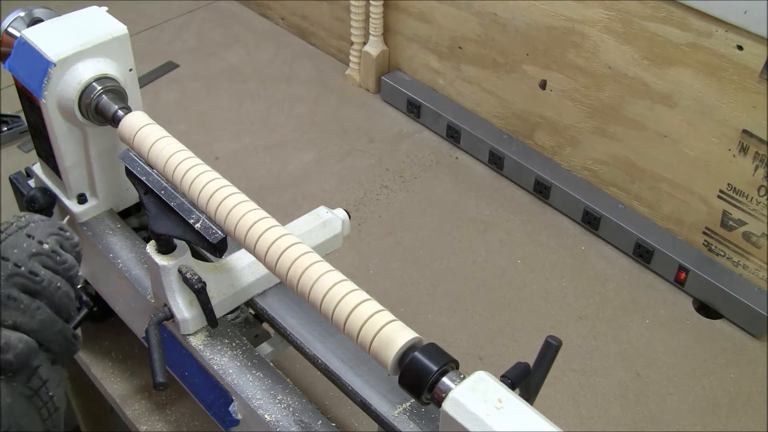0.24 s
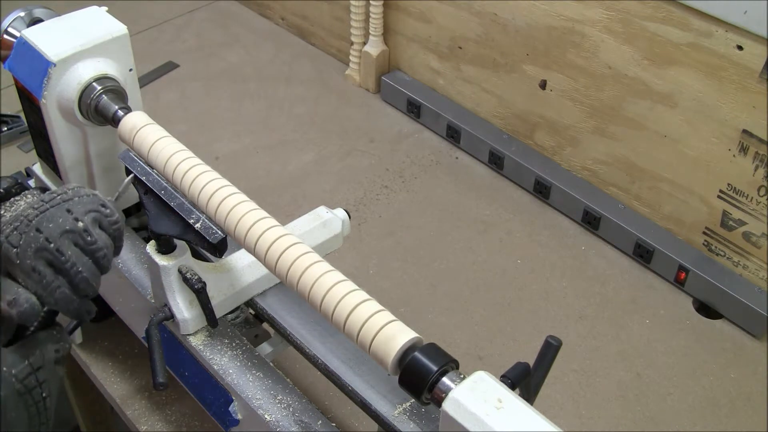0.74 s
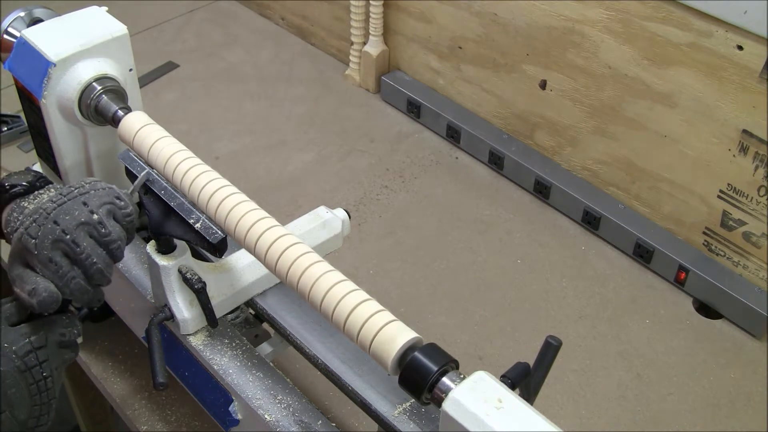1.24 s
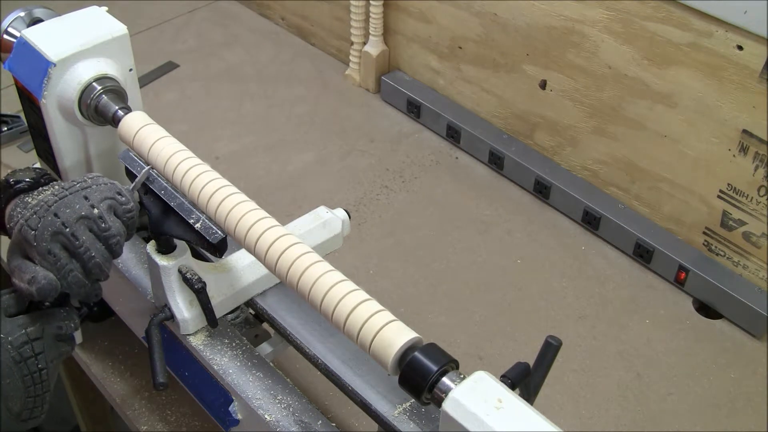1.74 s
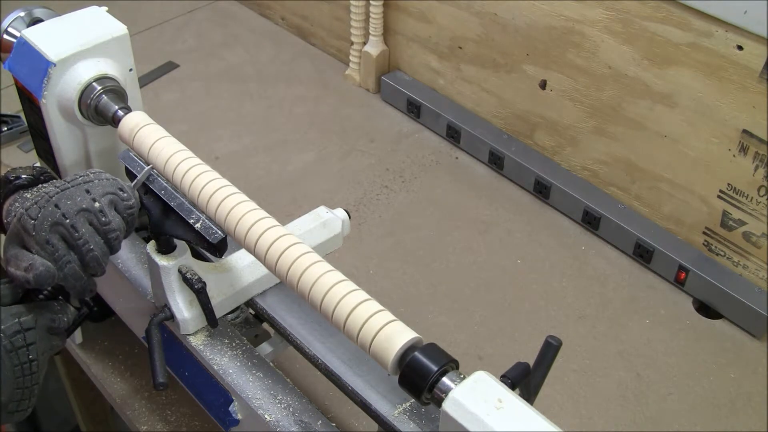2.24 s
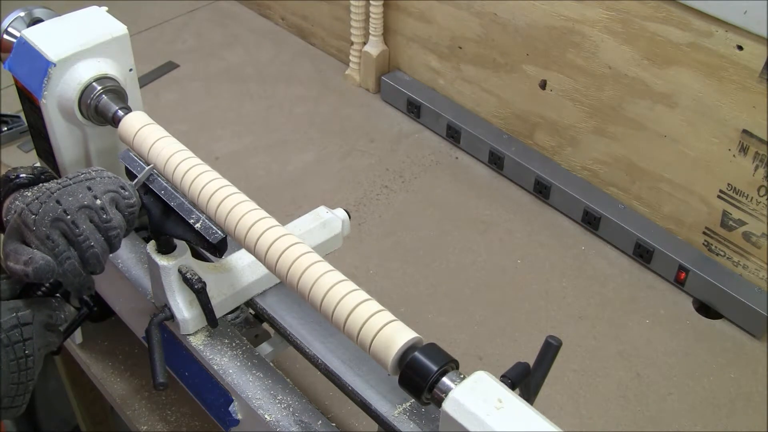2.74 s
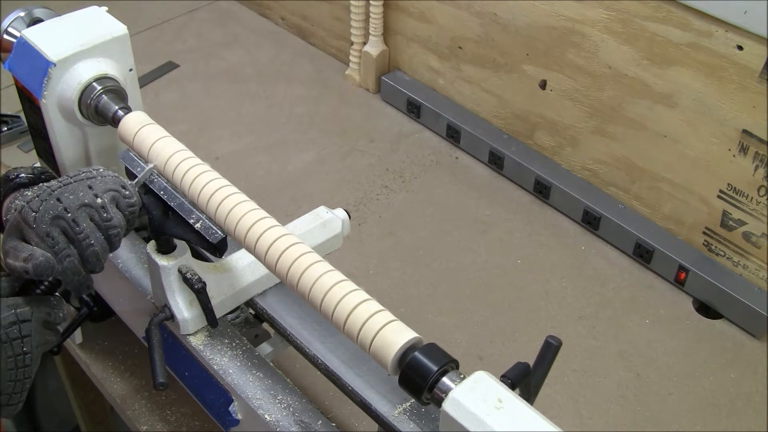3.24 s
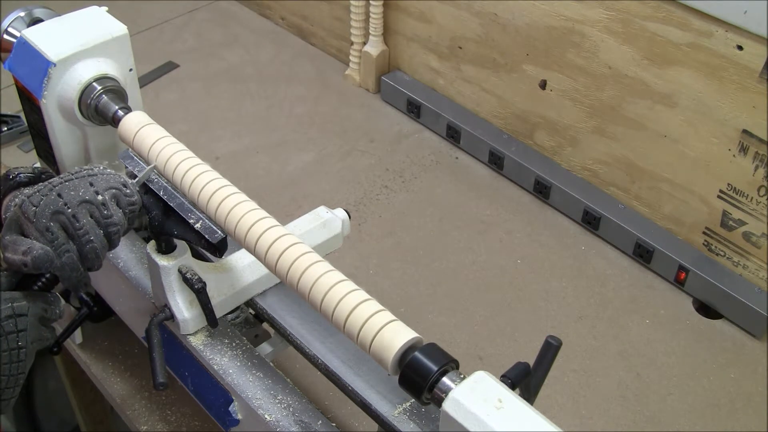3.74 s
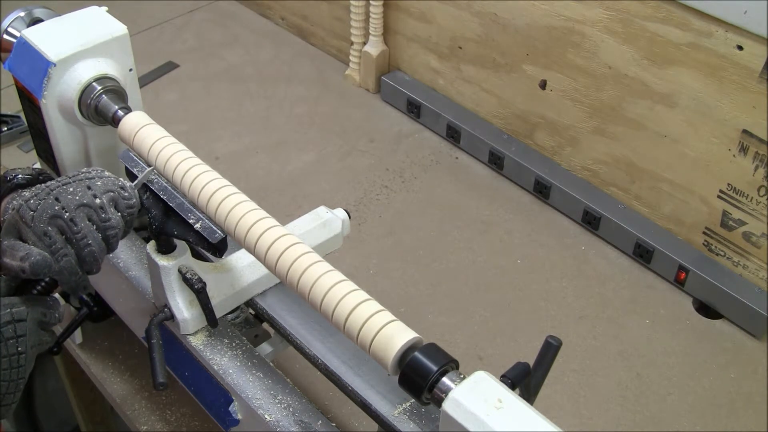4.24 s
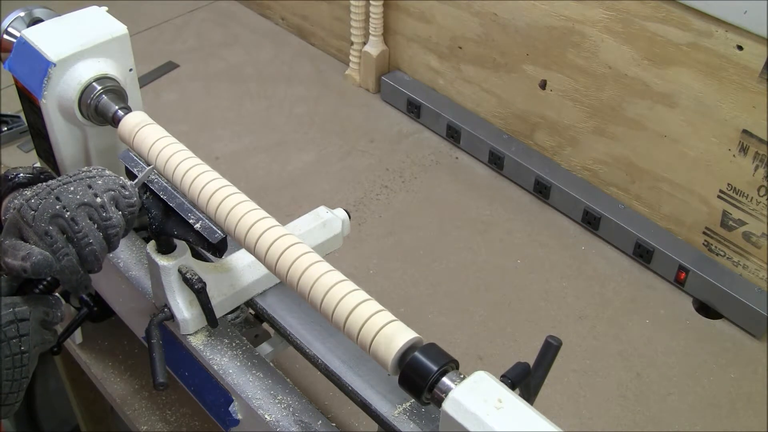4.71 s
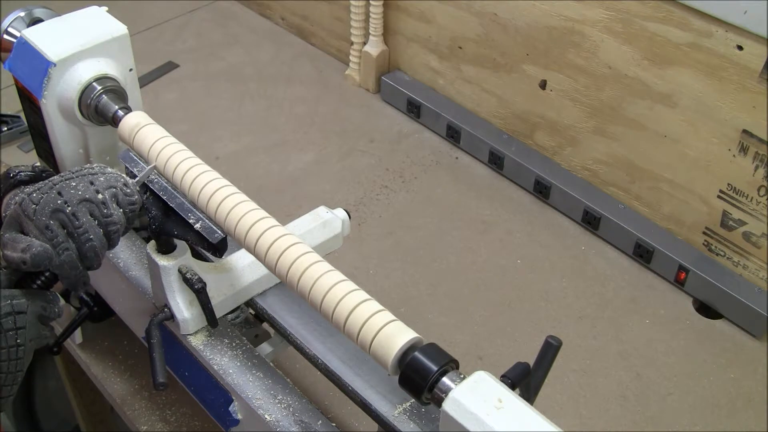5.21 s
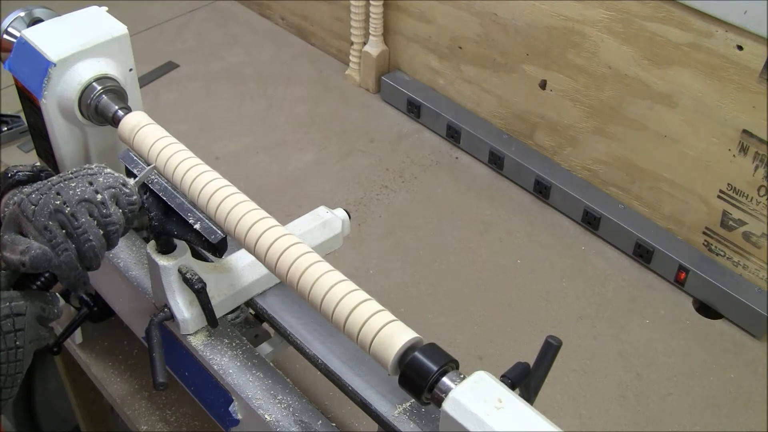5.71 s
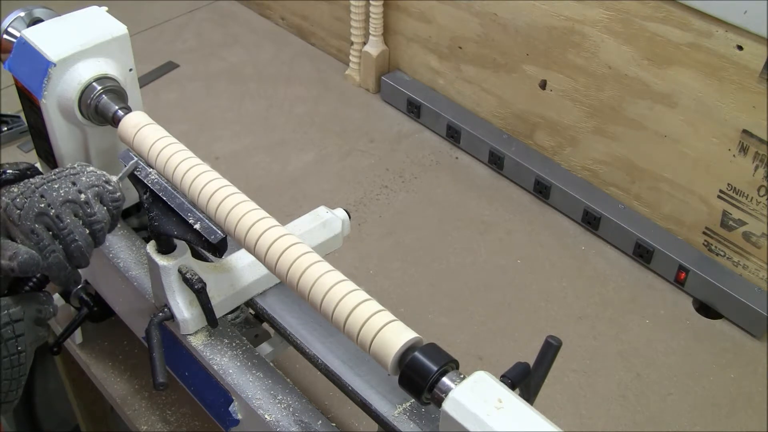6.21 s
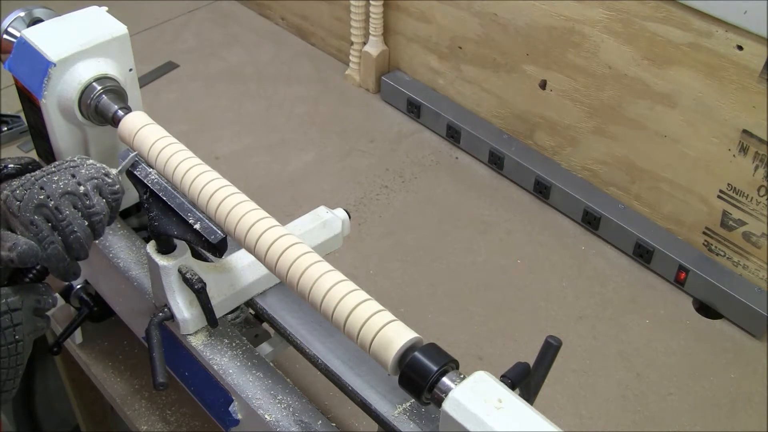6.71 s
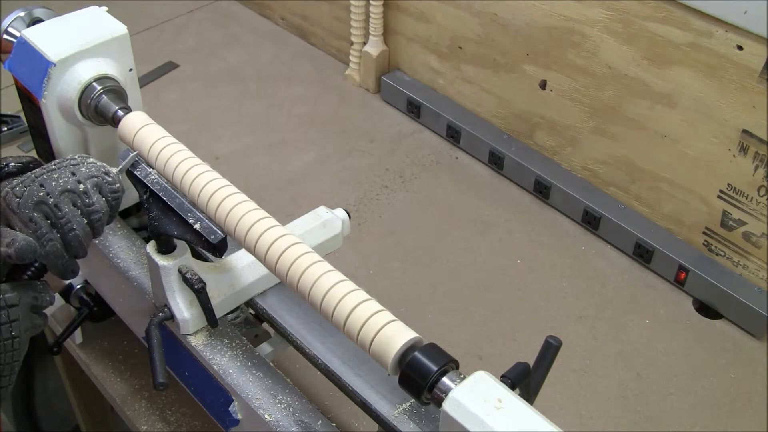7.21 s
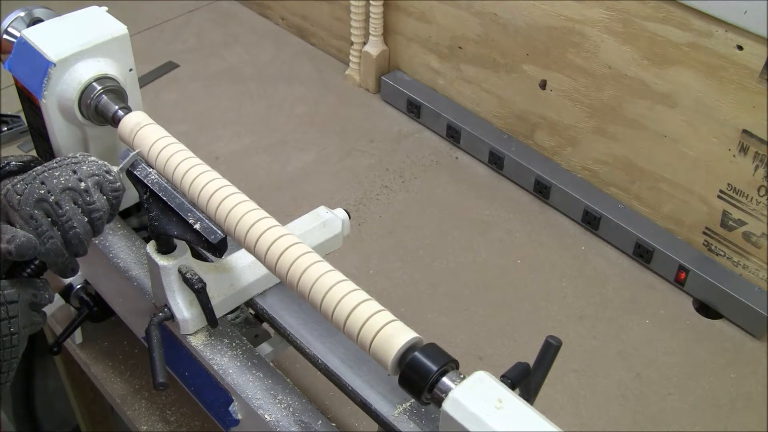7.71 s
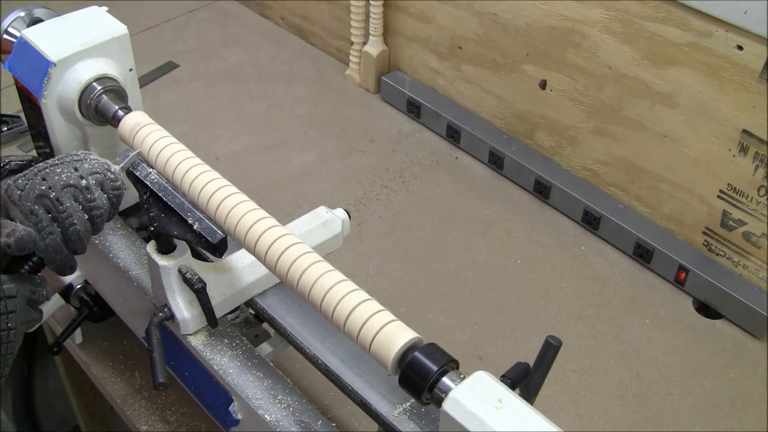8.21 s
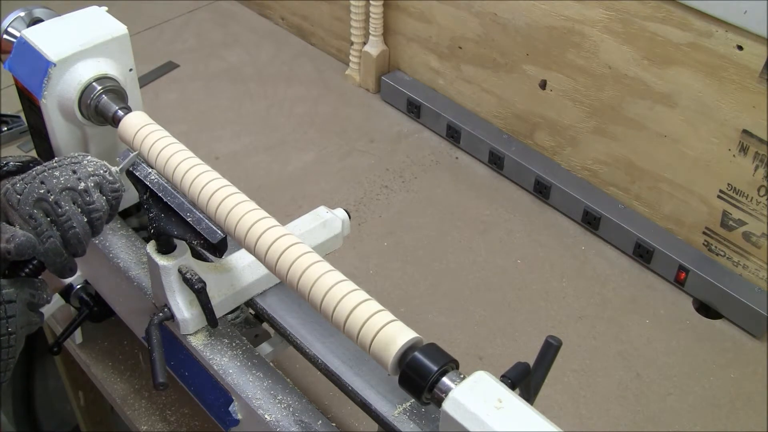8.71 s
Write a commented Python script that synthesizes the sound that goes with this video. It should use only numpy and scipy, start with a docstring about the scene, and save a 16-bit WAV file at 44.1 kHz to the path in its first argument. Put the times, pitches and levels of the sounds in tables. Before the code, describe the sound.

In a workshop with little echo, a nearby lathe hums, whines and rattles as it settles at speed. After almost three seconds a steel tool ticks against the spinning wood and bites in with a loud, rasping growl. Two more cuts follow, a couple of seconds apart, with light scrapes where the edge only skims the wood. The machine's pitch sags a little with each cut, then rises and settles.

```python
"""Turning wood on a lathe

A lathe comes up to speed in a workshop: its unbalanced drive hums, its bearings whine and rattle.
Three times a narrow steel tool is pushed into the spinning blank, ticking on the high side before it
bites fully; snapping fibres ring the wood and the steel. The spindle slows under load, overshoots and
settles after each cut, and an automatic gain control holds the cuts down."""
import sys
import numpy as np
from scipy import signal
from scipy.fft import rfft, irfft, next_fast_len
from scipy.io import wavfile
from scipy.ndimage import uniform_filter1d

SR = 44100
rng = np.random.default_rng(int(sys.argv[2]) if len(sys.argv) > 2 else 0)


def file_out(sig):
    """Save sig as 16-bit WAV at sys.argv[1]."""
    # one column per channel
    cols = np.atleast_2d(sig).T
    # limit, then scale
    lim = np.clip(cols, -1, 1)
    pcm = np.round(lim * 32767).astype(np.int16)
    wavfile.write(sys.argv[1], SR, pcm)


N = 394694
T = np.arange(N) / SR
HZ = np.fft.rfftfreq(next_fast_len(N), 1 / SR)
RUN_SPEED, SAG, OVERSHOOT = 22.64, 1.1, 1.0  # turns per second

# Plunges of the tool. Each row: in seconds, the start, the lengths of entry, feed, hold and easing off,
# and the delays to lowest speed and keenest bite; in dB, force, boom, rasp and off-round swing.
PLUNGES = [(2.802, 0.014, .78, .335, .18, 0.75, 0.21, 0.5, -0.5, -0.55, 8.5),
           (4.85, .04, .225, .575, 0.1545, .5, 0.45, -1, 3, -1.5, -4),
           (7.529, 0.012, .62, .25, .24, .66, 0.32, 1.5, -1, -0.5, 6.5)]
# Stereo balance of the machine. Each row: frequency in Hz, left over right in dB.
MACHINE_BALANCE = [(60, 22), (150, -0.5), (380, -2), (950, -3.5), (2380, -1.5), (5980, -0.5), (15000, 0)]


def cut(row, groove, scrape, turns, rounding_s=0.15, flare_s=0.15, leave_s=0.044):
    """Amplitude modulation: the high side strikes the edge once a turn, less as the groove gets round."""
    start, entry_s, feed_s, hold_s, ease_s, _, keen_s, force_db, boom_db, rasp_db, off_round_db = row
    since = np.maximum(T - start, 0)
    fresh = np.clip(1 - since / feed_s, 0, 1)
    depth = np.minimum(since / (feed_s + hold_s), 1)
    easing = np.clip((since - feed_s - hold_s) / ease_s, 0, 1)
    slack = easing ** 1.8
    lump_db = max(off_round_db, 0) * np.exp(-since / rounding_s)
    keen_db = 8 * np.exp(-((since - keen_s) / flare_s) ** 2) + lump_db - 19 * slack
    # A fresh cut is thin and raspy; as the tool eases off, the blank booms and the bevel rubs.
    boom_db = boom_db - 1.5 * fresh + 10.5 * easing
    rasp_db = rasp_db + 5 * fresh + 8 * easing
    # The lowest bending mode grows as the groove deepens and swings out when the tool lets go.
    bend_db = 5 * np.sin(np.pi * easing) - 6 * fresh - 3 * (1 - depth)
    sound = tool_grip(scrape, groove, (boom_db, rasp_db, keen_db, bend_db))
    swing_db = 2.5 + lump_db + 0.5 * depth ** 2  # deep in the groove the tool binds
    leaving = np.clip((feed_s + hold_s + ease_s - since) / leave_s + 1, 0, 1)
    touching = np.clip(since / entry_s, 0, 1) * leaving
    push_db = force_db - 26 * fresh - 32 * slack
    return sound * touching * amp(push_db + swing_db * contact(turns, start) + 0.89 * wander(60))


def contact(turns, start):
    """Periodic forcing: within each turn the edge bites fast and lets go slowly."""
    phase = (turns - np.interp(start, T, turns)) % 1
    return np.interp(phase, [0, .13, .32, .68, 1], [-.55, .48, .25, -.5, -.55])


def fibres(turns, snaps_per_s=7000, chips_per_s=90):
    """Impulse excitation: snapping fibres and chips, over a steady rub, ring the blank and the tool."""
    # Spectrum of tearing wood. Each row: frequency in Hz, relative density in dB.
    tearing = [(110, -36), (200, -37.5), (280, -18.5), (500, -9.5), (900, -20), (1300, 2.5), (2100, -9),
               (3000, -10), (4200, -18.5), (6300, -12), (7300, -25), (8800, -20), (12000, -22.5),
               (15600, -23.5)]
    # Resonances and notches of blank, tool and rest. Each row: centre and width in Hz, gain in dB.
    body_modes = [(296, 37, 16.5), (358, 14, -3.5), (398.5, 47, 10.5), (596.3, 18, 11), (648, 11, 4.5),
                  (709.5, 37, -8.5), (756.6, 65, 12.5), (819, 61, -12), (871, 130, 11), (1195, 14, 7.5),
                  (1234, 13, 7), (1640, 190, -6.5), (1790, 27, 8), (2090, 12, -18), (2330, 31, 2.5),
                  (2715, 77, 10), (3095, 57, 6), (3486, 200, 2), (3960, 300, 2.5), (8140, 164, 9)]
    # The blank's narrow singing modes. Each row: centre and width in Hz, gain in dB.
    singing_modes = [(393, 21.5, 7.5), (750, 65, 3.5), (2690, 64, 0)]
    snaps = (rng.random(N) < snaps_per_s / SR) * amp(3 * np.minimum(rng.exponential(1, N), 3))
    friction = evened(snaps * rng.choice([-1, 1], (2, N))) + rng.standard_normal((2, N))
    chips = (rng.random(N) < chips_per_s / SR) * rng.uniform(-4, 4, (2, N))
    force = recurring_grain(friction, turns) + brightened(chips)
    gain_db = read(tearing, HZ) + bumps(HZ, body_modes) + bumps(HZ, singing_modes)
    return evened(colour(force, gain_db + 5.5 * crowded_modes()))


def recurring_grain(friction, turns, memory=.78, coarse_hz=1600, samples_per_turn=1900):
    """Quasi-periodicity: coarse grain returns each turn, a little changed, so its growl follows speed."""
    rings = friction[:, :N - N % samples_per_turn].reshape(2, -1, samples_per_turn)
    grain = signal.lfilter([np.sqrt(1 - memory ** 2)], [1, -memory], rings, axis=1).reshape(2, -1)
    passing = np.take(grain, (turns * samples_per_turn).astype(int), axis=1, mode="wrap")
    low, high = (signal.butter(1, coarse_hz, kind, fs=SR) for kind in ("lowpass", "highpass"))
    return signal.lfilter(*low, passing) + signal.lfilter(*high, friction)


def tool_grip(scrape, groove, controls_db, boom_hz=850, rasp_hz=2200, dull_hz=7000):
    """Time-varying filtering: the tool's grip sets the boom, rasp, keenness and bending resonance."""
    # Modes of the lightly held tool. Each row: centre and width in Hz, share of the ring.
    tool_modes = [(2780, 47, 0.71), (3800, 80, 1), (6670, 97, 0.89), (7950, 1060, 1.0)]
    f, t, spectra = signal.stft(scrape, SR, nperseg=1024)
    boom_db, rasp_db, keen_db, bend_db = (np.interp(t, T, c + np.zeros(N)) for c in controls_db)
    f = f[:, None]
    gain_db = boom_db * (1 - above(f, boom_hz)) + rasp_db * above(f, rasp_hz)
    gain_db += bumps(f, groove) + bend_db * bump(f, hz=288, width=93)
    gain_db += np.maximum(keen_db, 0) * bumps(f, tool_modes)  # a keen bite rings the tool
    gain_db += np.minimum(keen_db, 0) * 0.77 * above(f, dull_hz)  # a rubbing bevel loses the top
    return signal.istft(spectra * amp(gain_db), SR, nperseg=1024)[1][:, :N]


def touches(scrape, attack_s=0.0036, release_s=0.0074, boom_db=3.5, rasp_db=8.0, bend_db=-7):
    """Light sliding friction: the edge catches or skims the wood with a thin, raspy scrape."""
    # Brief contacts. Each row: start and length in seconds, force and keenness in dB.
    grazes = [(2.847, 0.0067, -28, 13), (4.117, 0.03, -38.5, 1.5), (4.751, 0.05, -29.5, -1),
              (4.802, 0.093, -31.5, -13), (8.62, 0.11, -32.5, -12.5), (8.722, 0.036, -34, -11)]
    # Colour of the barely loaded tool. Each row: centre and width in Hz, gain in dB.
    light_load = [(2780, 170, -3), (3200, 390, 5)]
    force, keen_db = np.zeros((2, N))
    for start, length, db, keenness_db in grazes:
        corners_s = np.cumsum([0, attack_s, length, release_s])
        force += amp(db) * np.interp(T - start, corners_s, [0, 1, 1, 0])
        keen_db[T >= start - attack_s] = keenness_db
    return force * tool_grip(scrape, light_load, (boom_db, rasp_db, keen_db, bend_db))


def woodcutting(turns):
    """Superposition: cuts and touches sound in the room, with rumble below 120 Hz filtered out."""
    # Each groove's load on the tool, one list a cut. Each row: centre and width in Hz, gain in dB.
    grooves = [
        [(474, 76, 4), (4820, 3200, -1.5), (6300, 700, 1.5), (8500, 420, 2)],
        [(612.8, 68, 1), (3120, 450, 1), (4900, 610, 0), (6160, 870, 2), (12500, 4700, -0.5)],
        [(450.7, 57.8, 9), (3270, 634, 2), (5137, 2200, 4), (6220, 620, -5.5), (9900, 310, 6.5)],
    ]
    # Likeness of the two channels. Each row: frequency in Hz, coherence from 0 to 1.
    coherence = [(60, 1.0), (130, 0.99), (290, 0.99), (640, 1), (1410, 1), (3100, 1), (6820, 0.61),
                 (15000, 0.71)]
    # Stereo balance. Each row: frequency in Hz, left over right in dB.
    balance = [(60, -44), (130, 4), (290, -2.0), (640, -3), (1410, -1), (3100, -0.5), (6820, -0.5),
               (15000, 0)]
    # Phase between the channels. Each row: frequency in Hz, lead of the left in radians.
    phase_lead = [(60, 0), (3000, 0.56), (6500, 0), (8400, 0.83), (12000, 1.5), (15500, 2)]
    scrape = fibres(turns)
    cuts = sum(cut(row, groove, scrape, turns) for row, groove in zip(PLUNGES, grooves))
    highpass = signal.butter(2, 120, "highpass", fs=SR, output="sos")
    filtered = signal.sosfilt(highpass, cuts + touches(scrape))
    return stereo(workshop(filtered), coherence, balance, read(phase_lead, HZ))


def spindle(start_lag=4.55, spin_up_s=.35, settle_s=.29):
    """Transient response in turns per second: the drive spins up, sags in each cut and overshoots."""
    speed = RUN_SPEED - start_lag * np.exp(-T / spin_up_s)
    for start, _, feed_s, hold_s, ease_s, slowest_s, *_ in PLUNGES:
        slowest, end = start + slowest_s, start + feed_s + hold_s + ease_s
        dragged = np.sin(np.interp(T, [start, slowest], [0, np.pi / 2])) ** 2
        regained = np.interp(T, [slowest, end], [0, 1]) ** 2
        settling = np.exp(-np.maximum(T - end, 0) / settle_s)
        speed += ((SAG + OVERSHOOT) * regained - SAG * dragged) * settling
    return speed


def whine(speed, turns, flutter=0.34, slip_rad=0.48):
    """Random modulation: bearing tones flutter as the balls slip, and swell in the housing's band."""
    # Bearing and motor tones. Each row: multiple of the spindle speed, level in dB.
    orders = [(16.28, -66.5), (18.07, -58.5), (25.58, -55.5), (26.19, -66.5), (27.12, -53.5),
              (33.35, -55.5), (35.13, -66.5), (39.88, -59.5), (42.86, -57), (45.85, -59), (47.63, -45.5),
              (48.81, -47.5), (49.93, -51), (52.84, -54), (54.23, -46), (54.78, -51), (58.66, -53.5),
              (59.67, -41), (60.67, -44), (61.93, -50), (65.08, -46.5), (70.5, -49), (80.42, -54)]
    out, usual = np.zeros((2, N)), np.median(speed)
    for order, db in orders:
        housing_db = 15 * (housing(order * speed) - housing(order * usual))
        angle = 2 * np.pi * (order * turns + rng.random()) + slip_rad * wander(9)
        tone = np.sin(angle) * (1 + flutter * wander(45)) + flutter * wander(45) * np.cos(angle)
        pan = amp(read(MACHINE_BALANCE, order * usual) * np.array([[.5], [-.5]]))
        out += pan * amp(db + housing_db + strain(order, speed)) * tone
    return np.sqrt(2) * out


def housing(f):
    """Radiation efficiency: the bearing housing favours a broad band with a steep lower edge."""
    return bump(f, hz=1300, width=600) / (1 + np.exp((1045 - f) / 22))


def rattle(speed, turns, level_db=-39, balls_per_turn=5.43):
    """Rolling noise rings the frame, pulsing as each ball passes, with a thin swish once a turn."""
    # Spectrum of the rattle and hiss. Each row: frequency in Hz, relative density in dB.
    spectrum = [(25, -21), (55, -25), (75, -31), (110, -2.5), (200, -8.5), (280, -4.5), (600, -0.5),
                (1000, -7), (1330, 1), (1750, 0.5), (2200, -7.5), (3100, -9), (6500, -20.5), (15500, -24)]
    # Resonances of headstock and bed. Each row: centre and width in Hz, gain in dB.
    frame_modes = [(271, 10, 9.5), (585, 18, 5), (790, 34, 7), (1120, 86, 13), (2820, 1000, 5.5),
                   (3700, 270, 3), (5270, 44, 8.5)]
    # Likeness of the two channels. Each row: frequency in Hz, coherence from 0 to 1.
    coherence = [(60, 1.0), (150, 0.53), (380, 0.22), (950, 0.82), (2380, 0.84), (5980, 0.64),
                 (15000, 0.03)]
    angle = 2 * np.pi * turns
    pulse_db = 0.74 * np.cos(angle) + 2 * np.cos(balls_per_turn * angle) + 0.5 * wander(500)
    rolling = rng.standard_normal((2, N)) * amp(pulse_db)
    swish = 0.44 * np.sin(angle / 2) ** 16 * brightened(rng.standard_normal((2, N)))
    noise = stereo(rolling + swish, coherence, MACHINE_BALANCE)
    sound = colour(noise, read(spectrum, HZ) + bumps(HZ, frame_modes) + 3.5 * crowded_modes())
    return amp(level_db) * sound / np.std(sound.mean(0)) * speed / RUN_SPEED


def hum(speed, turns, gain_db=-1.5):
    """Forced vibration: unbalanced pulleys and belt shake the bench, more with speed and at resonance."""
    # Drive and belt tones. Each row: multiple of the spindle speed, relative level in dB.
    orders = [(2.832, -64), (3.064, -52.5), (3.296, -65), (3.529, -53), (3.76, -64), (4, -68), (4.944, -62),
              (5.427, -68), (7.539, -67), (10.85, -69), (11.31, -61), (11.9, -69), (14.28, -66)]
    # Low resonances of the bench. Each row: centre and width in Hz, gain in dB.
    bench_modes = [(74.3, 7, 13), (226, 32, 12)]
    out = np.zeros(N)
    for order, db in orders:
        gain = amp(db + bumps(order * speed, bench_modes) + strain(order, speed))
        out += gain * np.sin(2 * np.pi * (order * turns + rng.random()))
    shake = (speed / np.median(speed)) ** 4
    return np.sqrt(2) * amp(gain_db) * shake * out


def strain(order, speed):
    """Saturating gain in dB: a motor tone swells while the drive pushes past its set speed."""
    # Bands that swell. Each row: centre and width in Hz, greatest gain in dB.
    bands = [(265, 21, 11), (410, 40, 6), (770, 48, 5.5)]
    excess = np.maximum(speed - RUN_SPEED, 0)
    return np.tanh(excess / 0.3) * bumps(order * (RUN_SPEED + OVERSHOOT / 2), bands)


def glove(at_s=.26, half_width_s=0.032, level_db=-53):
    """Friction noise: a glove brushes faintly as the hand comes up to the rest."""
    band = signal.butter(2, [3000, 9000], "bandpass", fs=SR, output="sos")
    brush = evened(signal.sosfilt(band, rng.standard_normal((2, N))))
    return amp(level_db + 3 * wander(200)) * brush * np.exp(-((T - at_s) / half_width_s) ** 2)


def workshop(x, t60_s=0.27, wet_db=-13):
    """Reverberation: reflections from walls and bench add a short exponential tail."""
    t = np.arange(SR // 2) / SR
    tail = rng.standard_normal((2, len(t))) * amp(-60 * t / t60_s) * (t > .004)
    return x + amp(wet_db) * signal.fftconvolve(x, tail / np.linalg.norm(tail[0]), axes=1)[:, :N]


def stereo(pair, coherence, balance, lead_rad=0):
    """Partial coherence: two unrelated sounds blend into a left and a right channel."""
    size = 2 * (len(HZ) - 1)
    common, separate = rfft(pair, size)
    same = np.clip(read(coherence, HZ), 0, 1)
    tilt = amp(read(balance, HZ) / 2)
    right = (same * common + np.sqrt(1 - same ** 2) * separate) * np.exp(-1j * lead_rad)
    return irfft(np.array([common * tilt, right / tilt]), size)[:, :N]


def colour(x, db):
    """Minimum-phase filter with gain db over HZ: resonances ring after each blow."""
    size = 2 * (len(HZ) - 1)
    log_gain = np.log(amp(np.concatenate([db, db[-2:0:-1]])))
    response = np.exp(np.conj(signal.hilbert(log_gain)))[:len(HZ)]
    return irfft(rfft(x, size) * response, size)[..., :N]


def crowded_modes(spacing_hz=45, from_hz=2200):
    """Modal overlap: close modes ripple the treble response at random, between -1 and 1."""
    knots = np.arange(0, SR / 2, spacing_hz)
    heights = rng.uniform(-1, 1, len(knots))
    return np.interp(HZ, knots, heights) * HZ ** 2 / (HZ ** 2 + from_hz ** 2)


def bump(f, hz, width):
    """Lorentzian resonance curve of height 1."""
    return 1 / (1 + (2 * (f - hz) / width) ** 2)


def bumps(f, modes):
    """Superposition of resonance curves."""
    return sum(height * bump(f, hz, width) for hz, width, height in modes)


def above(f, hz):
    """Smooth shelf: 0 below hz, 1 above."""
    return 1 - 1 / (1 + (f / hz) ** 8)


def brightened(x):
    """Double differentiation tilts the spectrum up by 12 dB an octave."""
    return signal.lfilter([1, -2, 1], 1, x)


def read(points, hz):
    """Interpolation of a spectrum on a log-frequency axis."""
    f, value = np.transpose(points)
    return np.interp(np.log(hz + 1), np.log(f), value)


def wander(rate):
    """Random drift of rms 1 that changes about rate times a second."""
    knots = np.arange(0, T[-1] + 1, 1 / rate)
    return evened(np.interp(T, knots, rng.standard_normal(len(knots))))


def evened(x):
    """Normalisation to rms 1."""
    return x / np.sqrt(np.mean(x ** 2) + 1e-20)


def amp(db):
    """Decibels to amplitude ratio."""
    return 10 ** (np.asarray(db) / 20)


def scene():
    """Superposition: the cuts and the machine, all tied to one rotation, and the glove."""
    speed = spindle()
    turns = np.cumsum(speed) / SR
    return woodcutting(turns) + hum(speed, turns) + whine(speed, turns) + rattle(speed, turns) + glove()


def record(dry, threshold_db=-13.5, squeeze=0.94, peak_fall_db_per_s=70, edge_hz=15850):
    """Compression: gain control ducks everything in a cut and recovers quickly; a low-pass follows."""
    power_db = 10 * np.log10(abs(uniform_filter1d((dry ** 2).mean(0), size=500)) + 1e-12)
    fall_db = peak_fall_db_per_s * T
    peak_db = np.maximum.accumulate(power_db + fall_db) - fall_db
    over_db = np.maximum(peak_db - threshold_db, 0)
    ducked = dry / amp(squeeze * uniform_filter1d(over_db, size=200))
    lowpass = signal.firwin(511, edge_hz, window=("kaiser", 9), fs=SR)
    return signal.oaconvolve(ducked, lowpass[None], "same")


dry = scene()
out = record(dry)
file_out(out)
```